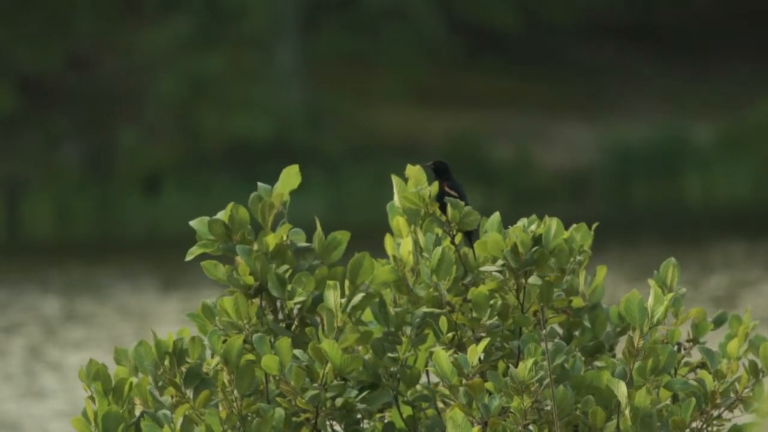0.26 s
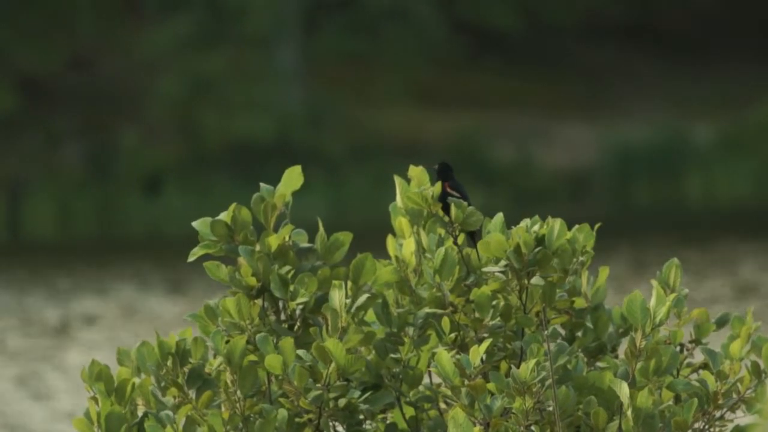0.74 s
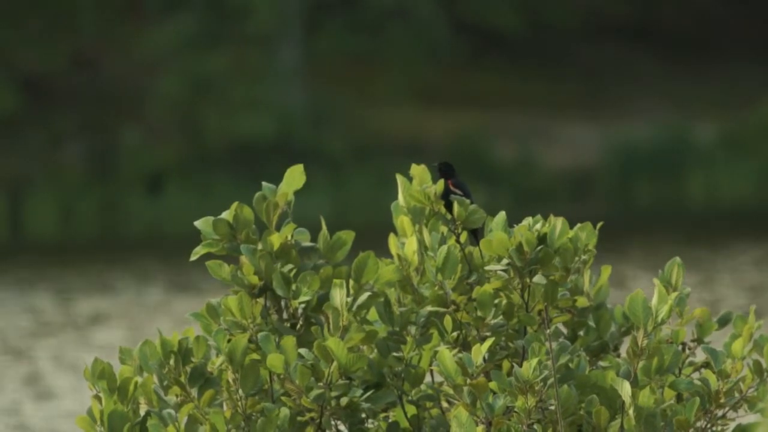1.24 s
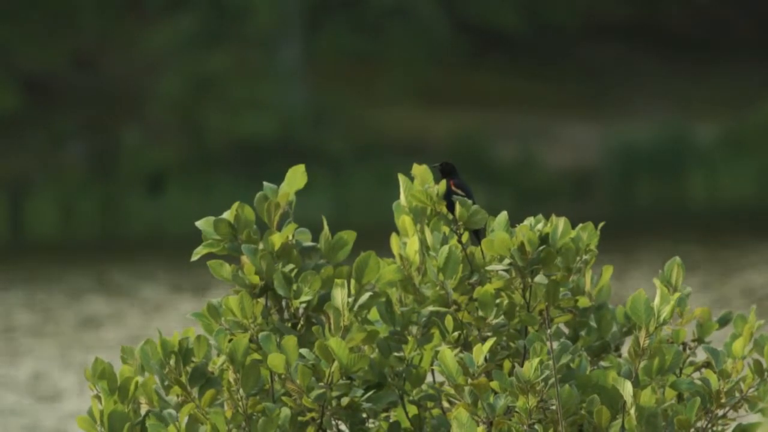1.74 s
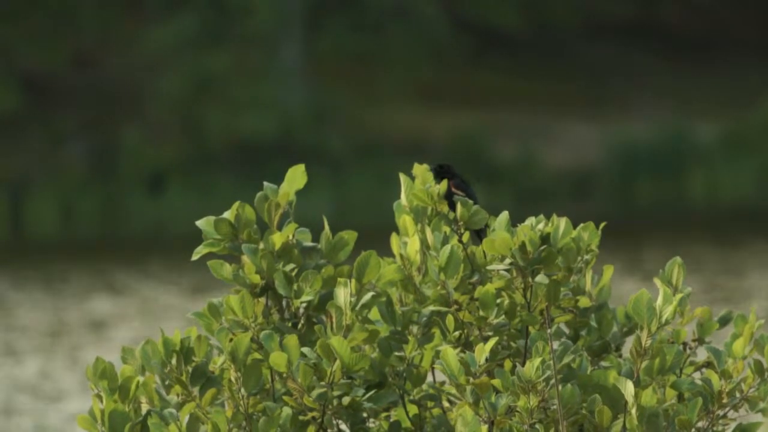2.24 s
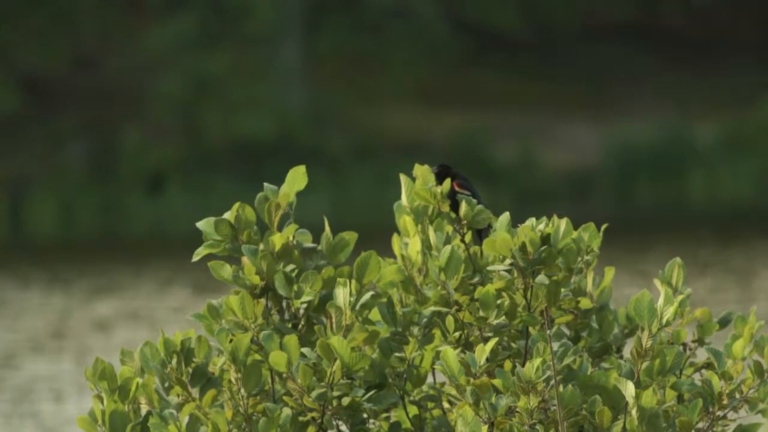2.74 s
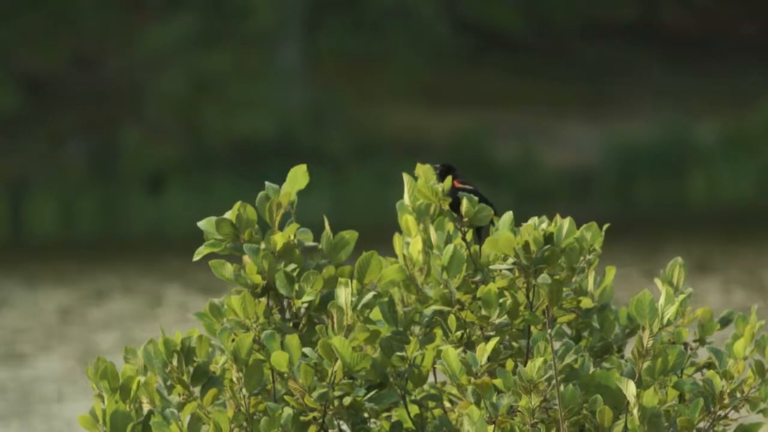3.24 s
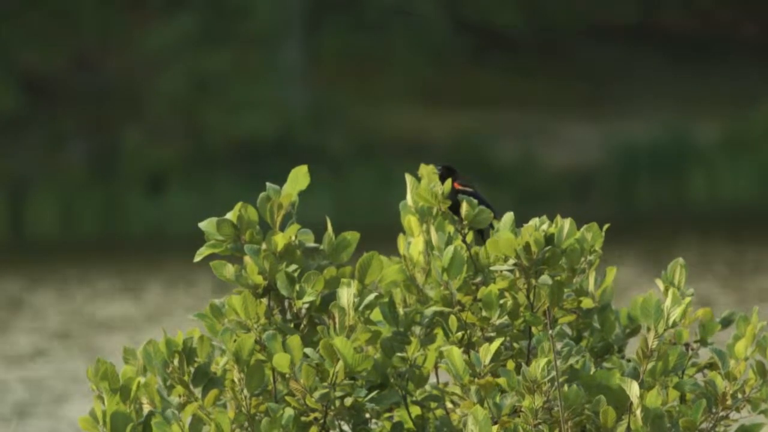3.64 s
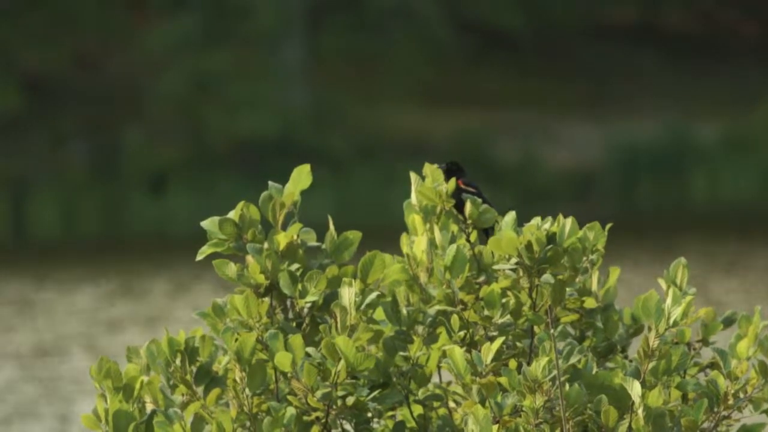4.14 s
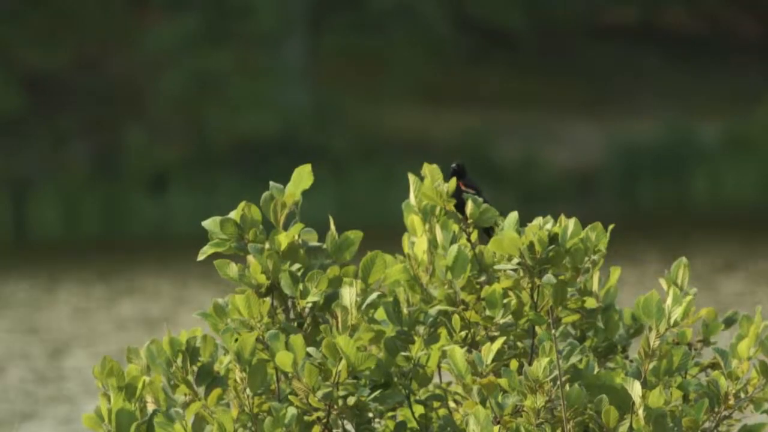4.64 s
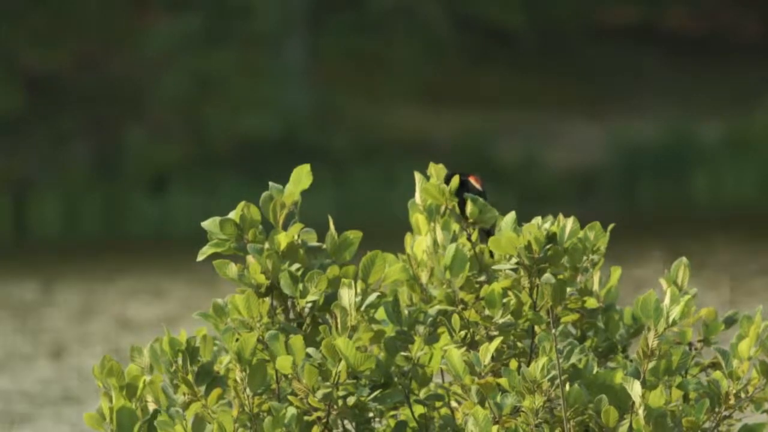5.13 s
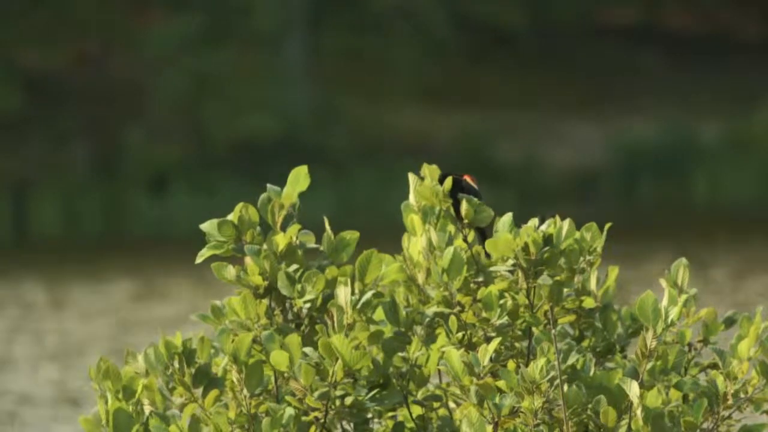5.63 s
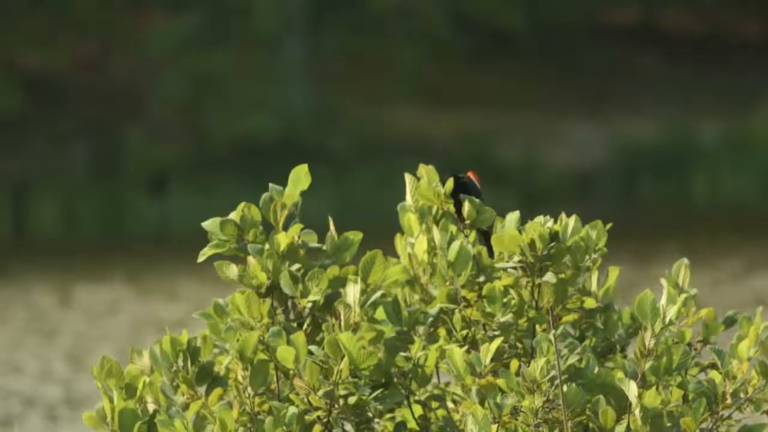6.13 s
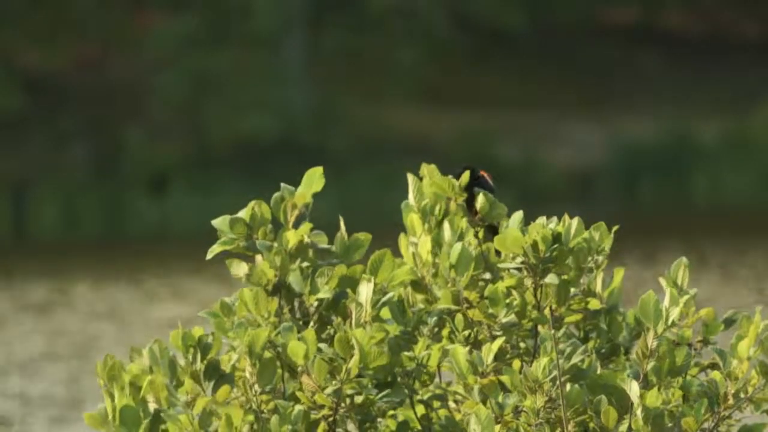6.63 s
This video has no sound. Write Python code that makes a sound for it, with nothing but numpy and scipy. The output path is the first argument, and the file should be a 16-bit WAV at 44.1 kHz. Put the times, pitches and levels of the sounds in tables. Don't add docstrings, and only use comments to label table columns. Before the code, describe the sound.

A quiet pond edge heard in open stereo: steady soft hiss of leaves and microphone, a very thin high insect drone, and a low distant engine hum that fades over the first two seconds. A tiny leaf tick comes near 0.5 s, faint thin seeps around 1 s. From 1.6 to 2.3 s a far rival bird gives a few quick notes and a blurred trill, slightly left. At about 2.5 s the main blackbird begins soft low whistles, rising to a loud short held note just before 3.0 s, then a flick and a loud, fast, two-toned buzzing trill until 3.7 s, slowing and falling slightly, its echo scattered by trees. A rubbery frog twang at 3.8 s is followed by weaker ones at 4.1 and 4.3 s. Faint chips follow to 4.9 s, then a hazy distant chorus, an arched whistle at 5.6 s, low murmurs near 5.9 s and a falling whistle at 6.7 s.

```python
import sys
import numpy as np
from scipy import signal
from scipy.io import wavfile
from scipy.ndimage import uniform_filter1d, map_coordinates

SR = 44100
rng = np.random.default_rng(int(sys.argv[2]) if len(sys.argv) > 2 else 0)


def linear_from_db(decibels):
    return 10 ** (np.asarray(decibels, float) / 20)


def unload_wav(signal):
    wavfile.write(
        sys.argv[1],
        SR,
        np.round(np.clip(np.atleast_2d(signal).T, -1, 1) * 32767).astype(np.int16),
    )


N = 303441
TIME = np.arange(N) / SR


def unit(x):
    return x / np.sqrt(np.mean(np.abs(x) ** 2) + 1e-20)


def along(points, hz):
    f, v = np.transpose(points)
    return np.interp(np.log(hz + 1), np.log(f + 1), v)


def curves(rows):
    s, *cols = np.transpose(rows)
    return [np.interp(TIME, s, c) for c in cols]


def wobble(rate, size=N):
    knots = rng.standard_normal(size // 20 + 4)
    return map_coordinates(knots, [np.arange(size) * np.clip(rate / SR, 0, 1 / 20)])


def tone(hz):
    return np.sqrt(2) * np.sin(2 * np.pi * np.cumsum(hz) / SR)


def shaped(rows, peak, rise_db, fall_db, arch=0, settle=None, hz=None):
    u = np.linspace(0, 1, num=33)
    peak = np.clip(peak, .05, .95)
    rise_loss = rise_db * np.clip(1 - u / peak, 0, 1)
    fall_loss = fall_db * np.clip((u - peak) / (1 - peak), 0, 1)
    loss_db = rise_loss + fall_loss
    glide = 1 - np.exp(-u / settle) if settle else u
    bow = 1 + arch * np.sin(np.pi * u ** .68) ** 0.83
    if hz:
        rows = [(s, length, hz, hz, db) for s, length, db in rows]
    return [np.transpose([s + length * u, (a + (b - a) * glide) * bow, db - loss_db])
            for s, length, a, b, db in rows]


def notes(tables, fade, husky, husk_hz=400):
    out = np.zeros(N)
    for rows in tables:
        s, hz, db = np.transpose(rows)
        a, b = round(s[0] * SR), min(round(s[-1] * SR), N)
        t = TIME[a:b]
        edge = np.sin(np.pi / 2 * np.clip(np.minimum(t - s[0], s[-1] - t) / fade, 0, 1))
        breathy = 1 - husky + husky * wobble(husk_hz, size=b - a)
        out[a:b] += edge * breathy * linear_from_db(np.interp(t, s, db)) * tone(np.interp(t, s, hz))
    return out


def trill(beat, hz, gestures, t0, t1, fade, scatter_db, soft, husky, husk_hz, half_db, upper_db):
    span = slice(round(t0 * SR), round(t1 * SR))
    beat, hz, t, sound = beat[span], hz[span], TIME[span], 0
    for k, (start, end, rise0, rise1, db) in enumerate(gestures):
        number = np.floor(beat - start)
        u = np.clip((beat - start - number) / (end - start), 0, 1)
        luck = rng.standard_normal((64, 2))[number.astype(int) % 64]
        ratio = (rise0 + (rise1 - rise0) * u ** 1.6) * (1 + 0.00707 * luck[:, 0])
        turn = np.pi * np.cumsum(hz * ratio) / SR
        hoarse = [1 - h + h * wobble(husk_hz, size=len(t)) for h in np.clip([husky, 2 * husky], 0, 1)]
        voice = hoarse[0] * np.sin(2 * turn)
        if k == 0:
            voice = voice + hoarse[0] * linear_from_db(half_db) * np.sin(turn)
            voice = voice + hoarse[1] * linear_from_db(upper_db) * np.sin(3 * turn)
        swell = np.abs(np.sin(np.pi * u)) ** soft
        sound = sound + linear_from_db(db + scatter_db * luck[:, 1]) * swell * voice
    out = np.zeros(N)
    out[span] = unit(sound) * np.clip(np.minimum(t - t0, t1 - t) / fade, 0, 1)
    return out


def echo(gap, lumpy_db, slow, size):
    # f/Hz, t60/s
    decay = [(1000, 1.9), (2400, 2.7), (3000, 1.57), (5000, 1.05), (9000, 0.13)]
    hz, t, z = signal.stft(rng.standard_normal((2, size)), SR, nperseg=256)
    fading = linear_from_db(-60 * t / (slow * along(decay, hz)[:, None]))
    tail = signal.istft(z * fading, SR, nperseg=256)[1][:, :size]
    tail = tail * linear_from_db(lumpy_db * wobble(21.5, size=size))
    delay = round(gap * SR)
    return np.pad(tail / np.linalg.norm(tail[0]), ((0, 0), (delay, 8 * SR // 5 - size - delay)))


def placed(x, pan_db, near_db, far_db):
    foliage = linear_from_db(near_db) * echo(0.001997, 2, 0.045, size=SR // 4)
    tree_line = linear_from_db(far_db) * echo(0.027, 0.74, 0.75, size=3 * SR // 2)
    answer = foliage + tree_line
    pan = linear_from_db([[pan_db / 2], [-pan_db / 2]])
    return pan * (x + signal.fftconvolve(x[None], answer, axes=1)[:, :N])


def rush(spectrum, patchy_db):
    # f/Hz, likeness/1
    alike = [(40, 0.82), (150, 0.77), (300, -0.004), (700, -0.13), (1500, -0.3), (5000, -0.47),
             (15000, 0.015)]
    hz, _, z = signal.stft(rng.standard_normal((2, N)), SR, nperseg=2048)
    field = unit(uniform_filter1d(uniform_filter1d(rng.standard_normal(z.shape[1:]), 20, 0), 3, 1))
    turn = np.arccos(np.clip(along(alike, hz), -1, 1)) / 2
    colour = linear_from_db(along(spectrum, hz)) * np.array([np.cos(turn), np.sin(turn)])
    z = z * colour[..., None] * linear_from_db(patchy_db * field)
    mid, side = signal.istft(z, SR, nperseg=2048)[1][:, :N]
    return unit(np.array([mid + side, mid - side]))


def air():
    # t/s, level/dB
    breeze = [(0, 0), (.3, -0.5), (1.03, 0.5), (1.66, 0), (2.3, 0), (3.07, -0.5), (4.04, 0), (5.5, -1),
              (6.19, 0.5), (6.88, 0)]
    # f/Hz, density/dB
    rumble = [(15, -70), (25, -34), (48, -32), (65, -38), (118, -20), (135, -17), (151, -19.5), (262, -13),
              (392, -8), (1200, -12), (1560, -23), (2640, -120)]
    leaves = [(590, -11.5), (1000, -40), (1300, -6.5), (1430, -6), (1560, -3.5), (2470, -3), (2680, -1.5),
              (3180, -3), (3420, -2.5), (3960, -3.5), (4620, -6), (5310, 4.5), (7000, -12), (9100, -16),
              (15400, -120)]
    hiss = [(3710, -3.5), (6300, -6), (7540, -8), (9230, -5), (11000, -5), (12600, -2.5), (13500, -4),
            (15700, -8.5)]
    breeze_db, = curves(breeze)
    rumble_db = -61.5 + 0.82 * breeze_db + .6 * wobble(4)
    leaves_db = -56 + 0.4041 * TIME + 0.1 * breeze_db + .5 * wobble(4.5)
    hiss_db = -60.5 + 2.3 * breeze_db + .4 * wobble(5)
    return (linear_from_db(rumble_db) * rush(rumble, patchy_db=0.5)
            + linear_from_db(leaves_db) * rush(leaves, patchy_db=1.2)
            + linear_from_db(hiss_db) * rush(hiss, patchy_db=0.4))


def insects():
    pulse = 1 + 0.74 * np.sin(2 * np.pi * np.cumsum(39.4 + 0.42 * wobble(3.05)) / SR)
    pair = tone(np.full(N, 12947.5)) + linear_from_db(-4) * tone(np.full(N, 13007.5))
    high = linear_from_db(-72.5 + 0.91 * wobble(5)) * unit(pulse * pair)
    low = linear_from_db(-81.0 + 2.4 * wobble(9)) * tone(9700 + 25 * wobble(60))
    tick = linear_from_db(-56 - 60 * np.abs(TIME - .467) / 0.011) * wobble(1980) * tone(np.full(N, 8000.0))
    return (high + low + tick) * linear_from_db([[-.6], [.6]])


def engine():
    # t/s, level/dB
    fading = [(0, -56), (.65, -55), (.94, -58.5), (1.53, -65), (2.07, -76), (2.47, -70), (2.87, -91),
              (3.6, -76.5), (5.0, -78), (5.5, -74), (6.15, -89), (6.88, -70.5)]
    orders_hz = (120.8, 84.7, 160, 237.5)
    # t/s, length/s, from f/Hz, to f/Hz, peak level/dB
    drone = [(5.4, 0.64, 237.5, 237.5, -69.5)]
    # t/s, length/s, from f/Hz, to f/Hz, peak level/dB
    murmurs = [(.7, 0.73, 260, 258, -69), (5.9, 0.47, 340, 328.4, -67)]
    main_db, = curves(fading)
    gone_db = main_db - main_db.max()
    levels = (main_db, -66 + 0.42 * gone_db, main_db - 13.5, -79 + 0.21 * gone_db)
    hum = 0
    for hz, db, shake_db in zip(orders_hz, levels, (1.0, 2.4, 2.8, 3.1)):
        hum = hum + linear_from_db(db + shake_db * wobble(15)) * tone(hz * (1 + 0.0047 * wobble(5.1)))
    swell = notes(shaped(drone, 0.33, 15, 5.3), fade=0.06, husky=0.14, husk_hz=18)
    croaks = notes(shaped(murmurs, 0.6, 4, 3.3), fade=.05, husky=.9, husk_hz=121.8)
    return (hum + swell + croaks) * linear_from_db([[.3], [-.3]])


def frog():
    # (f/Hz, level/dB)
    twangs = [
        (3.838, -38, 0.1, [(345, -1.5), (395, -4), (520, -3.5), (690, -8.5), (1150, -19), (1700, -10), (2200, -7)]),
        (4.096, -49, 0.24, [(421, -4), (632, 0), (535, -6)]),
        (4.34, -49.5, 0.19, [(560, -3), (426, -13)]),
    ]
    out, t = np.zeros(N + SR), np.arange(SR // 2) / SR
    dull = signal.butter(4, 2400, fs=SR, output="sos")
    for s, db, t60, partials in twangs:
        ring = 0
        for hz, level_db in partials:
            decay = linear_from_db(level_db - 60 * t / t60 * (hz / 500) ** 0.35)
            ring = ring + decay * np.sin(2 * np.pi * hz * t)
        snap = linear_from_db(-15) * np.exp(-t / .004) * unit(signal.sosfilt(dull, rng.standard_normal(len(t))))
        onset = 1 - np.exp(-t / 0.0077)
        rough = 1 + 0.32 * wobble(116, size=len(t))
        out[round(s * SR):][:len(t)] += linear_from_db(db) * (onset * rough * ring + snap)
    return placed(out[:N], pan_db=0, near_db=-13.5, far_db=-10.5)


def rival():
    # from/beat, to/beat, pitch ratio from/1, to/1, level/dB
    gestures = [(0, .6, 1.02, .97, 1), (.35, 0.99, 1.33, 1.19, -1), (0.25, .7, 1.8, 1.6, -9),
                (.4, .99, 1.95, 1.8, -15), (.1, .6, 1.16, 1.33, -6)]
    # t/s, length/s, from f/Hz, to f/Hz, peak level/dB
    opening = [
        (1.62, 0.038, 2440, 2480, -61),
        (1.68, .022, 1690, 1580, -53),
        (1.717, .016, 3445, 3620, -55),
    ]
    start_s, end_s = 1.74, 2.27
    since = np.clip(TIME - start_s, 0, None)
    level_db = -58.5 + 5.5 * np.exp(-since / 0.047) - 5 * since
    buzz = trill(0.57 + 64.5 * since, np.full(N, 2827), gestures, start_s, end_s, .015,
                 scatter_db=1.2, soft=.8, husky=.5, husk_hz=700, half_db=-40, upper_db=-13)
    buzz = linear_from_db(level_db - 4.5) * buzz
    first = notes(shaped(opening, 0.85, 3.3, 4), fade=0.0046, husky=0.13)
    return (placed(buzz, pan_db=-16, near_db=-1.5, far_db=-4.5)
            + placed(first, pan_db=-9, near_db=-9, far_db=-14))


def far_whistles():
    # t/s, length/s, from f/Hz, to f/Hz, peak level/dB
    straight = [(1.25, 0.13, 1798, 1834, -70.5), (2.7, .19, 2850, 2940, -67.5),
                (2.795, 0.075, 13730, 13800, -61), (5.67, 0.076, 2130, 2140, -69),
                (6.638, 0.023, 3440, 3850, -61)]
    seeps = [(.865, .02, 9650, 9580, -67), (.91, .055, 9300, 9650, -60.5), (1.025, .025, 9500, 9200, -73),
             (1.06, .035, 9100, 8900, -65), (1.125, .035, 8850, 8800, -67)]
    settling = [(5.88, 0.14, 3560, 3290, -68), (6.682, 0.33, 4450, 3733, -57)]
    arched = [(5.62, .2, 3740, 3810, -52.5)]
    lines = shaped(straight, 0.76, 4, 4) + shaped(seeps, .5, 7.8, 11, arch=0.041)
    lines = lines + shaped(settling, 0.86, 2.1, 3, settle=.04)
    clear = notes(lines, fade=.005, husky=.08, husk_hz=150)
    return clear + notes(shaped(arched, 0.75, 9.5, 3, arch=.125), fade=0.0064, husky=0.13, husk_hz=144)


def husky_calls():
    # t/s, length/s, peak level/dB
    chips = [(4.42, 0.088, -59), (4.57, .08, -57), (4.74, 0.074, -57.5), (4.89, .03, -62)]
    chorus = [(4.36, 0.23, -65), (5.05, 0.13, -64), (5.15, .2, -68), (5.85, 0.22, -63), (6.05, 0.29, -67),
              (6.7, 0.26, -64)]
    bed = (4.3, 2.58, -76)
    # t/s, length/s, from f/Hz, to f/Hz, peak level/dB
    squeaks = [(2.955, .03, 11300, 11360, -57), (2.985, .035, 11700, 11500, -48),
               (2.985, .035, 14300, 14400, -60)]
    rustle = [(2.95, 0.8, 11900, 11600, -65), (2.98, .52, 14700, 14600, -66),
              (.27, 0.16, 11700, 11700, -65.5)]
    puffs = [(3.01, .03, 12200, 12800, -55), (3.012, .03, 13800, 14600, -56)]
    calls = shaped(chips, .35, 4, 6, hz=3530) + shaped(squeaks, .35, 11, 15)
    crowd = shaped(chorus, 0.43, 10, 18, hz=3176) + shaped([bed], .5, 0, 0, hz=3176)
    return (notes(calls, fade=0.0053, husky=0.92, husk_hz=346)
            + notes(crowd, fade=.03, husky=1.0, husk_hz=194.4)
            + notes(shaped(rustle, .12, 2, 9), fade=0.026, husky=0.87, husk_hz=1900)
            + notes(shaped(puffs, .5, 6, 6), fade=0.0046, husky=.95, husk_hz=2000))


def neighbours():
    small = far_whistles() + husky_calls()
    return rival() + placed(small, pan_db=-4, near_db=-11, far_db=-6.5)


def lead_in():
    # t/s, f/Hz, level/dB
    lead = [
        [(2.542, 1470, -52), (2.552, 1515, -44), (2.575, 1530, -39.5), (2.64, 1487, -43), (2.675, 1505, -52)],
        [(2.725, 1970, -58), (2.738, 1920, -49), (2.751, 1878, -42), (2.767, 1925, -32.5), (2.773, 1930, -35)],
        [(2.78, 1370, -40), (2.798, 1485, -34), (2.876, 1528, -42), (2.91, 1487, -48.5), (2.93, 1500, -44)],
        [(2.956, 2400, -30), (2.961, 2273, -25), (2.966, 2300, -29)],
        [(2.966, 2385, -29), (2.972, 2365, -26.5), (2.986, 2360, -25), (2.996, 2380, -27), (3.004, 2400, -33),
         (3.013, 2460, -44)],
    ]
    # t/s, length/s, from f/Hz, to f/Hz, peak level/dB
    graces = [(2.48, 0.031, 1226, 1095, -54.5), (2.505, 0.039, 755, 764, -57.5),
              (2.545, 0.096, 1813, 1730, -50.5), (2.645, 0.052, 1260, 1390, -53),
              (2.76, 0.012, 2270, 2100, -52), (2.83, 0.071, 1650, 1793, -50),
              (2.86, 0.045, 2010, 1890, -56), (2.93, 0.013, 1260, 1230, -51),
              (2.949, 0.0057, 2300, 2300, -31)]
    # t/s, length/s, peak level/dB
    returns = [(3.09, 0.087, -41), (3.7, 0.11, -57), (3.93, 0.091, -60), (4.04, 0.054, -59),
               (4.14, 0.087, -64)]
    song = notes(lead[:3] + shaped(graces, .4, 7, 10), fade=.004, husky=.07)
    song = song + notes(shaped(returns, 0.23, 7.5, 10, hz=2330), fade=0.014, husky=0.32, husk_hz=60)
    loud = notes(lead[3:], fade=.002, husky=.03)
    return (placed(song, pan_db=-1.5, near_db=-18, far_db=-16)
            + placed(loud, pan_db=-2, near_db=-18, far_db=-22))


def loud_trill():
    # t/s, length/s, from f/Hz, to f/Hz, peak level/dB
    flick = [
        (3.012, .005, 2500, 3240, -44),
        (3.017, .005, 3240, 5700, -36),
        (3.022, .005, 5700, 5600, -41),
        (3.022, .006, 3390, 2620, -35),
    ]
    # t/s, level/dB, f/Hz
    strength = [(3.032, -31, 3380), (3.22, -31, 3229), (3.45, -32, 3170), (3.685, -35, 3083)]
    # from/beat, to/beat, pitch ratio from/1, to/1, level/dB
    gestures = [(-.14, .8, 1.02, .96, -0.5), (.34, .97, .875, .82, -3), (.64, .82, 0.78, 1.3, -1),
                (.82, .97, 1.0, 1.55, -2), (0.869, 1.12, 1.1, 1.19, -5), (.05, 0.69, 1.23, 1.17, -14.5),
                (.65, 1.1, 1.6, 1.57, -15.5)]
    level_db, hz = curves(strength)
    number = np.arange(-1, 32)
    beat_s = 3.034 + .020633 * number + 3.556e-5 * number ** 2
    beat = np.interp(TIME, beat_s, number)
    buzz = trill(beat, hz, gestures, 3.028, 3.685, .004, scatter_db=.8, soft=.55,
                 husky=.15, husk_hz=900, half_db=-32, upper_db=-11)
    buzz = linear_from_db(level_db - 1.33) * buzz
    buzz = buzz + notes(shaped(flick, 0.25, 1, 3), fade=0.00081, husky=0.58, husk_hz=900)
    top = signal.sosfiltfilt(signal.butter(4, 4200, "high", fs=SR, output="sos"), buzz)
    body = placed(buzz - top, pan_db=-2.5, near_db=-10, far_db=-20)
    return body + placed(top, pan_db=3.5, near_db=-0.5, far_db=-7)


def blackbird():
    return lead_in() + loud_trill()


def scene():
    return air() + insects() + engine() + frog() + neighbours() + blackbird()


def top_cut(x):
    return signal.sosfilt(signal.butter(12, 16150, fs=SR, output="sos"), x)


def record(dry):
    mix = signal.sosfilt(signal.butter(3, 58, "high", fs=SR, output="sos"), dry)
    return top_cut(mix)


dry = scene()
out = record(dry)
unload_wav(out)
```